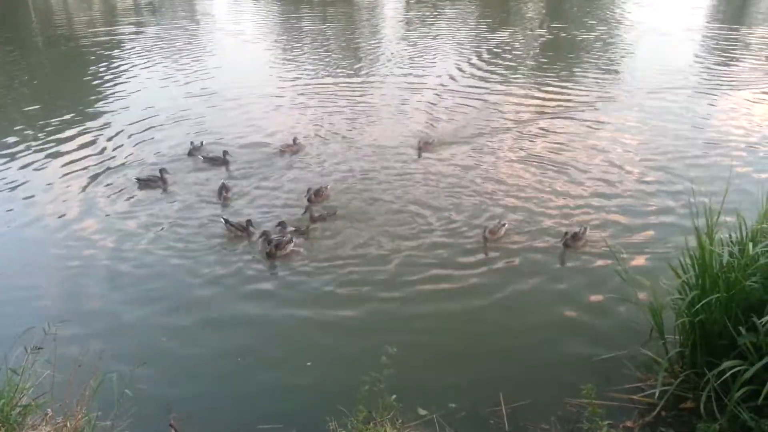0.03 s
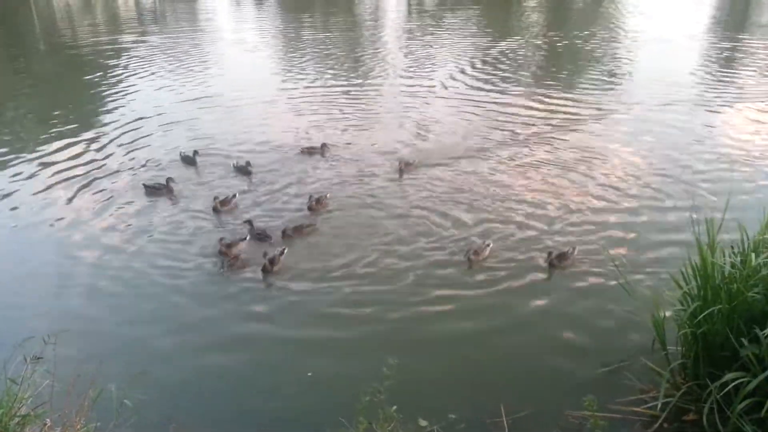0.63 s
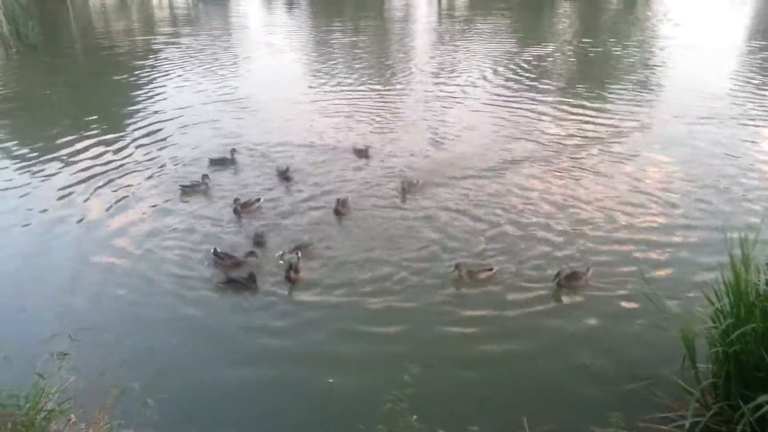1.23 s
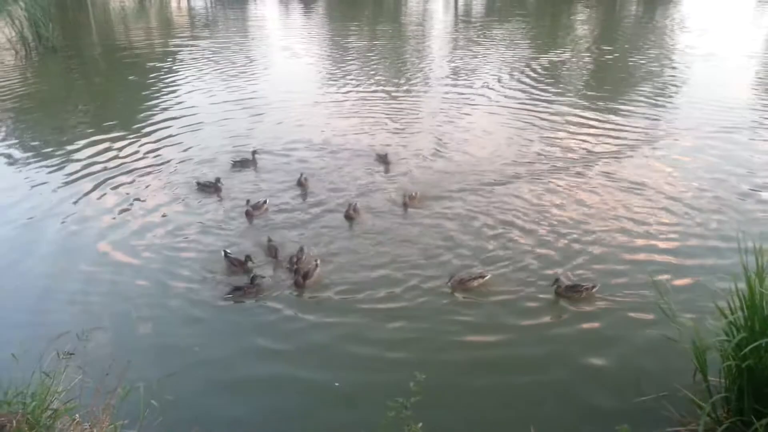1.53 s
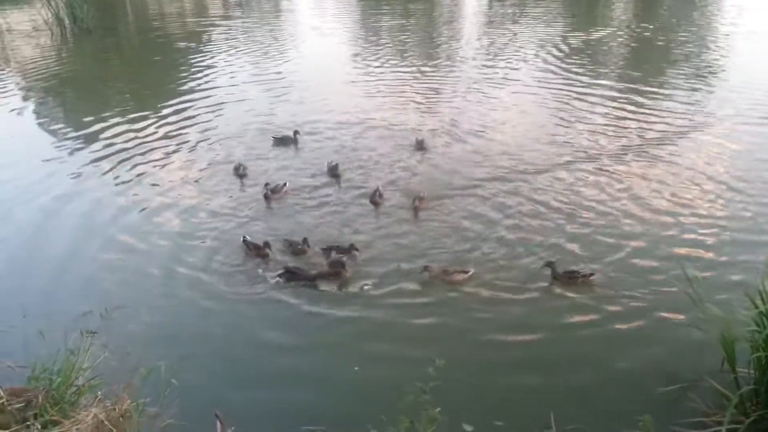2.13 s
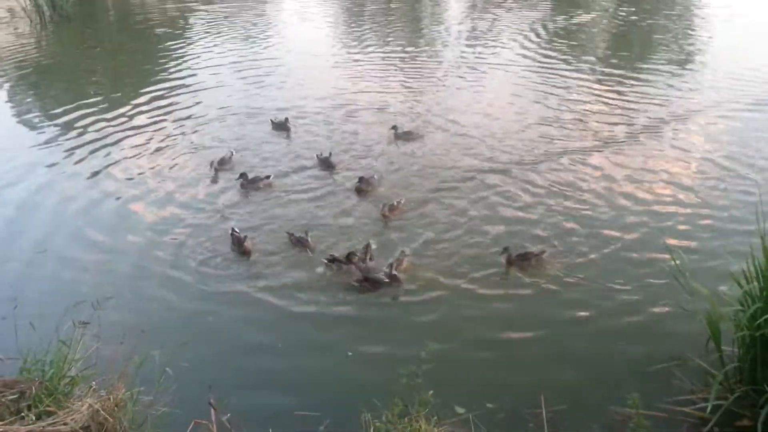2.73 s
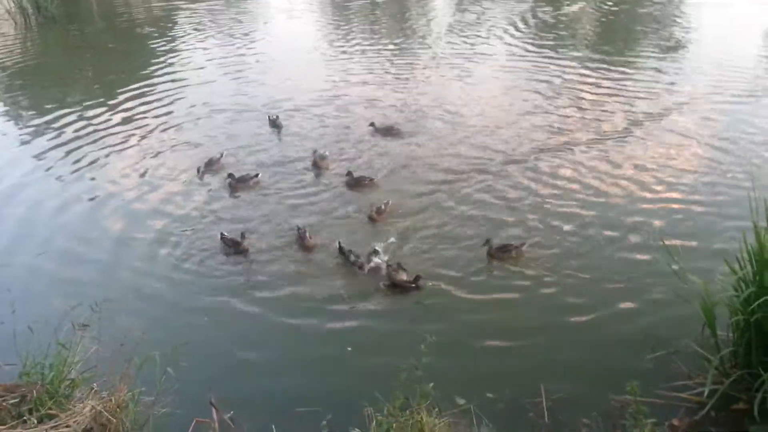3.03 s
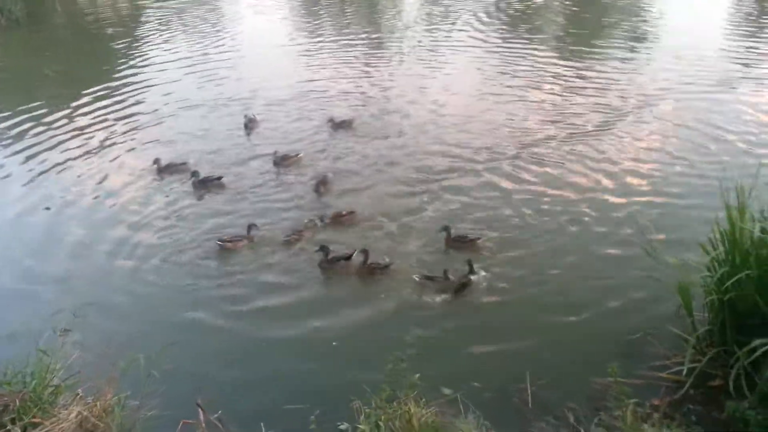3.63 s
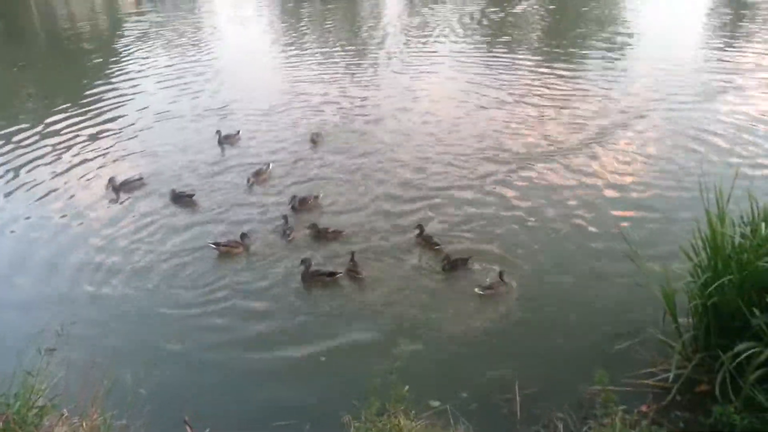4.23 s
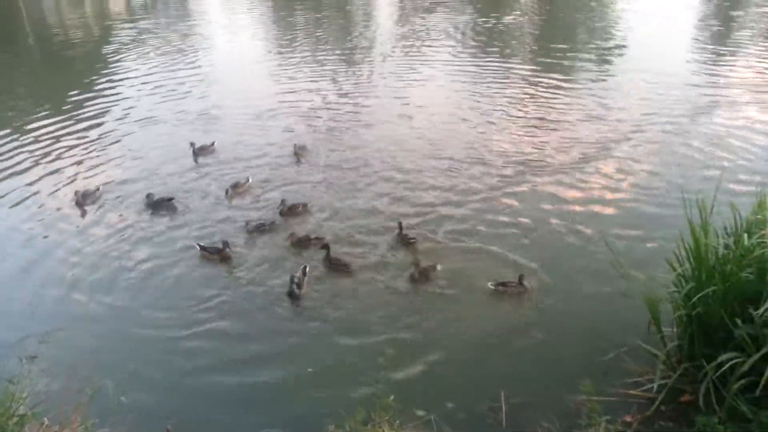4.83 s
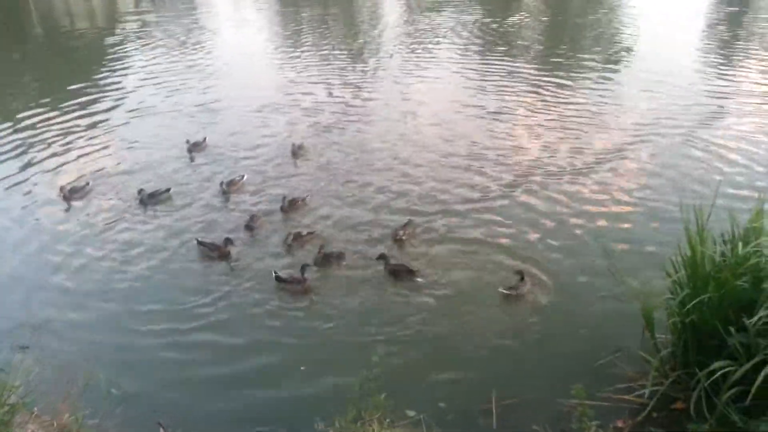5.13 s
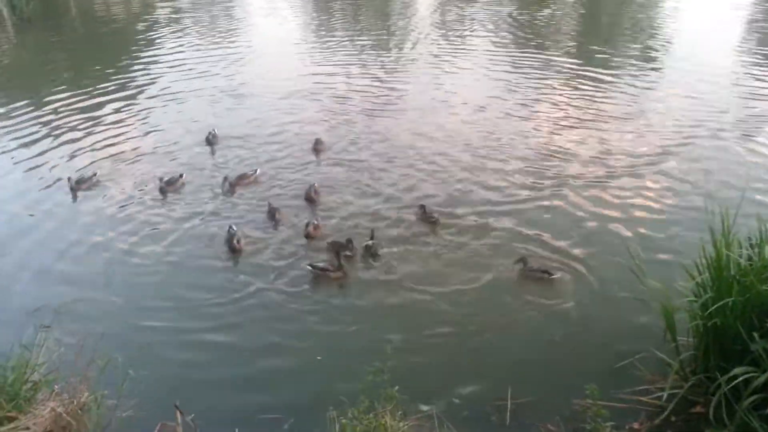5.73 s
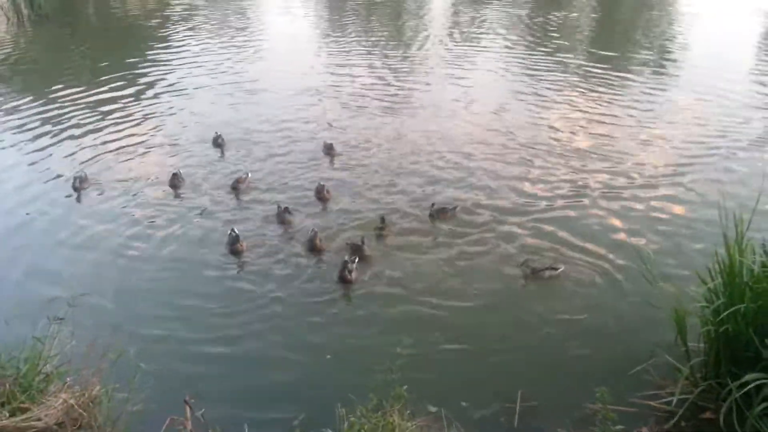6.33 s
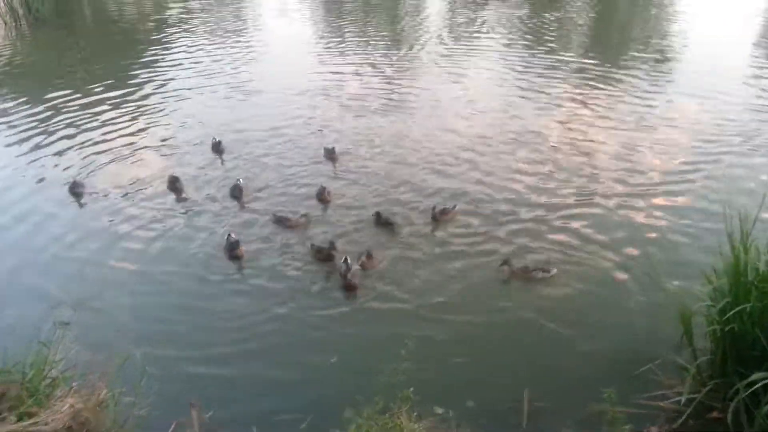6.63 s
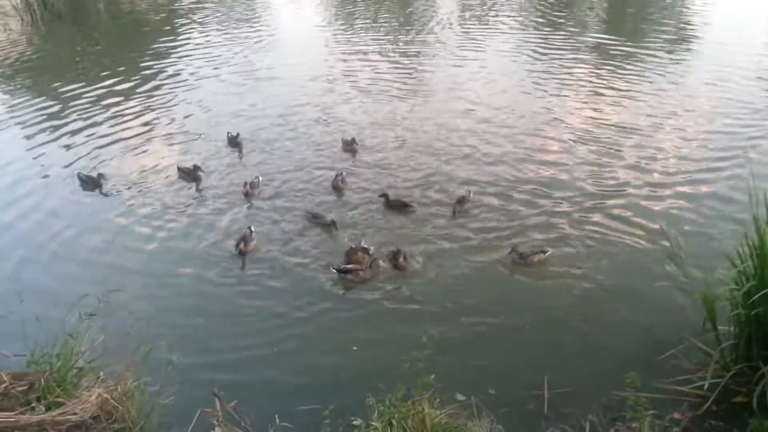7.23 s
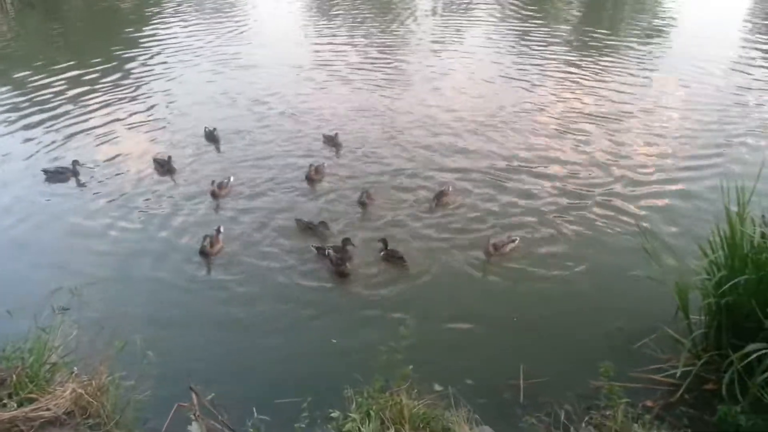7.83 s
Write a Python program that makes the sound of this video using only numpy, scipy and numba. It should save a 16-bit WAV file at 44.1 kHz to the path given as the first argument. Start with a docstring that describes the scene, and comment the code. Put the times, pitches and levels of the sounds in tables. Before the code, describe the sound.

Water plinks and splashes as a flock of ducks paddles, nibbles and quacks briefly, with a faint low outdoor drone behind.

```python
"""On a lake, a few metres out from the bank, a flock of ducks jostles for food.
Their feet stir up spray, drops that plink and bubbles that plop and gurgle; their bills snap and nibble.
They give short, reedy quacks as the voice box claps and makes the throat and bill ring, and thin
whistles when they blow gently. A distant town rumbles behind, and the banks return a faint echo."""
import sys
import numpy as np
from scipy import signal
from scipy.fft import rfft, irfft
from scipy.io import wavfile
from numba import njit

SR = 44100
rng = np.random.default_rng(int(sys.argv[2]) if len(sys.argv) > 2 else 0)


def int16_out(signal):
    """Quantize to a 16-bit WAV file."""
    q = np.round(np.clip(np.atleast_2d(signal).T, -1, 1) * 32767)
    wavfile.write(sys.argv[1], SR, q.astype(np.int16))


N = 352800
TIME = np.arange(N) / SR
FREQUENCIES_HZ = np.arange(N // 2 + 1) * SR / N
SIDES = np.array([[1], [-1]])   # left, right

# the tone of the open air: frequency_hz, relative_db
AIR_TONE = [(15, -58), (25, -37), (103, -6), (158, -2), (224, -9), (293, -9.5), (588, -7), (655, -11),
            (978, -3), (1310, -16), (1630, -11.5), (3730, -26), (6040, -30), (13800, -30), (15000, -42)]
# how alike the background is on the left and right: frequency_hz, likeness (0 to 1)
STEREO_LIKENESS = [(25, .4), (60, 0.95), (150, 0.95), (290, 0.96), (640, 0.47), (1400, 0), (4000, 0),
                   (15000, 0)]
# far engines in the town: pitch_hz, width_hz, level_db
ENGINES = [(78.6, 3.6, -66), (118.5, 13, -65.5), (142.8, 6.5, -53.5), (156, 8.5, -54), (184.1, 7.2, -54.5),
           (283.5, 57, -54.5), (323, 92, -52.5), (960, 450, -55)]
# the slow swell of those engines: time_s, gain_db
ENGINE_SWELL = [(0, 1), (1.6, -0.5), (3.2, 1.6), (4.6, 0.5), (6.7, 3.5), (8, 2.5)]
# how hard the flock paddles: time_s, effort_db
PADDLING_EFFORT = [(0.0, -53), (0.49, -51.5), (0.76, -59), (1.23, -57), (1.98, -60), (2.09, -53),
                   (2.47, -44), (2.76, -44.5), (3.36, -51), (3.83, -46), (4.19, -56), (4.94, -61),
                   (5.86, -51), (6.28, -59), (7.2, -56.5), (7.38, -51), (7.73, -54), (8.0, -52.5)]
USUAL_EFFORT_DB = -54
# the tone of the fine spray: frequency_hz, relative_db
SPRAY_TONE = [(400, -27), (650, -8.5), (950, 0), (1400, -25), (2000, -4.5), (3500, -5.5), (5200, -10),
              (7000, -23), (9500, -17.5), (12500, -21), (15000, -52)]
# large bubbles under feet and breasts: start_s, level_db, pitch_hz
BIG_BUBBLES = [(.063, -39, 770), (.461, -38.5, 930), (1.198, -34.5, 810), (2.252, -33, 995),
               (2.276, -27, 936), (2.367, -30, 1800), (2.413, -27.5, 950), (3.406, -30, 1210),
               (5.73, -40, 885), (5.742, -36.5, 877), (6.350, -38, 1545)]
# air pockets squeezed out of the water: middle_s, half_length_s, level_db, pitch_hz,
# rise_octaves (over each half)
AIR_POCKETS = [(0.111, .015, -38, 880, 0.37), (.486, 0.03, -38.5, 1520, 1), (1.304, 0.013, -39, 1856, .35),
               (1.335, 0.013, -39, 1755, 0.15), (2.347, .022, -33.5, 1354, .7),
               (2.587, .015, -36, 1832, 0.24), (2.724, 0.018, -51, 1320, 0.16),
               (3.994, 0.0099, -30.5, 2010, 0.67), (4.922, 0.013, -51, 2720, 0.48),
               (5.584, 0.024, -42.5, 1920, 0.71), (5.947, 0.0092, -33, 1640, 0.62),
               (7.254, 0.012, -32, 1280, 0.45), (7.773, 0.0072, -31.5, 1740, 0.089)]
# bills snapping shut: start_s, level_db, lowest_pitch_hz
BILL_SNAPS = [(.163, -21.5, 2290), (0.2358, -20.5, 2540), (2.106, -23, 2050), (2.84, -23.5, 2970),
              (2.8434, -18.5, 5550), (3.4374, -23, 2220), (6.354, -30.5, 3430), (7.1368, -39.5, 4230),
              (7.2412, -22.5, 3000), (7.3983, -25, 3730), (7.6176, -25.5, 3080)]
# the tones a bill rings with: multiple_of_lowest_pitch, level_db, ring_s
BILL_TONES = [(1, 0.5, 0.0037), (1.24, 5.5, 0.0034), (1.5, 16.5, 0.00086), (1.9, 7, 0.001),
              (2.3, -7, 0.0024)]
# bills nibbling fast at the surface: start_s, end_s, level_db, swell_db, pitch_hz, unevenness
NIBBLE_RUNS = [(0.254, .33, -33.5, 1, 1860, 0.95), (1.283, 1.384, -33, 0, 1860, 1.02),
               (3.278, 3.329, -27.5, -5, 1870, .6), (3.418, 3.46, -35, 8, 2630, 1.14),
               (5.402, 5.481, -38, -5, 2440, 1.23), (5.609, 5.748, -35, 8, 2400, 0.2),
               (7.249, 7.32, -31, -3, 2370, 1.04), (7.439, 7.604, -32.5, -2, 1960, 0.57)]
# the quacks: loudest_s, rise_s, fall_s, pitch_hz, throat_glide_octaves (per 30 ms), level_db,
# windpipe_hz, windpipe_db, lower_throat_hz, upper_throat_hz, upper_over_lower_db, bill_hz, bill_db,
# reedy_db, reedy_top_hz, rasp (0 to 1), left_delay_us
QUACK_CALLS = [(.402, 0.015, 0.015, 338, 0.086, -36, 880, -7, 1440, 2160, 3, 4100, -2, -5, 8000, 0.5, 54),
               (0.658, 0.018, .014, 357.7, 0.18, -27, 750, -1.5, 1500, 2120, 7, 3200, -6.5, -6, 10000, 0.37, 39),
               (.953, 0.026, 0.011, 287.6, -0.12, -28, 1000, -4, 1600, 1820, 10.5, 3620, -17.5, -9, 11000, 0.38, -3),
               (1.741, 0.018, 0.01, 277.2, 0.037, -31, 900, -3, 1350, 1950, 1, 3520, -14.5, -11, 8000, 0.33, -36),
               (1.938, 0.0098, 0.014, 371, 0.057, -34, 880, -2, 1970, 2800, -23.5, 4070, 5, -14, 7000, 0.66, 35),
               (2.025, 0.021, 0.016, 291.7, -.013, -24.3, 990, -2, 1510, 2000, 5.5, 3700, -15.5, -6.5, 7840, 0.2, -43),
               (2.873, 0.015, 0.02, 291.5, -0.03, -24, 860, -7, 1486, 2130, -2, 5200, -13, -13.5, 10800, 0.4, -37),
               (3.084, 0.011, 0.013, 394, 0.068, -31.5, 900, -4, 1220, 2340, 11, 3150, 0.5, 0.5, 9000, 0.6, 2),
               (3.700, 0.01, 0.0074, 325.6, .034, -25, 1030, -5, 1840, 2320, -0.5, 3930, -6.5, -10, 11000, 0.56, -69),
               (3.950, 0.016, 0.012, 376, 0.25, -18, 1150, -2, 1400, 1900, 11.5, 3980, 2, -0.5, 11700, 0.53, -62),
               (4.877, 0.0076, 0.011, 309, -.15, -26.3, 900, 0.5, 1610, 2220, -0.5, 4480, -12, -15, 7000, 0.64, 36),
               (5.141, 0.011, .015, 330.4, -0.06, -23, 915, -3.5, 1560, 2254, -7.5, 3050, -19.5, -14.5, 10000, 0.31, 51),
               (5.887, 0.015, 0.011, 370.5, .08, -32.5, 785, -2, 1180, 2030, 11, 3860, 4.5, -8, 8000, 0.3, 8),
               (6.656, 0.013, 0.013, 279.8, -0.023, -25.2, 1010, -7, 1650, 2270, 0.5, 3670, -13.5, -6, 5600, 0.44, 33),
               (6.943, 0.013, 0.0073, 280, 0.077, -27, 1100, -6, 1720, 2190, 0, 3320, -10, -9, 5500, 0.22, 25),
               (7.981, 0.013, 0.0082, 299, -0.011, -31, 900, -9, 1360, 2530, -4, 3270, -13.5, -18, 7000, 0.13, 16)]
# the high bands that make every quack reedy: centre_hz, width_hz, level_db
REEDY_BANDS = [(5210, 780, -13), (6600, 1000, -13.5), (8500, 940, -17), (9950, 700, -19.5)]
# thin whistles, around the quacks or alone: middle_s, half_length_s, level_db, pitch_hz,
# glide_octaves (over each half), arch_octaves
WHISTLE_CALLS = [(0.623, 0.039, -40, 896, -0.031, -0.12), (0.694, 0.023, -46, 1037, -0.43, -0.031),
                 (0.915, 0.02, -37, 1092, -.35, 0), (0.982, 0.023, -34.5, 1286, -0.38, 0.028),
                 (1.766, 0.033, -38, 1287, -0.16, 0.099), (1.997, 0.015, -31, 1387, -.4, 0.048),
                 (2.061, 0.037, -36.5, 1230, -0.44, 0.17), (2.917, 0.023, -38, 1370, -.25, 0.045),
                 (3.069, 0.014, -30.5, 1160, -.45, 0.03), (3.125, 0.047, -35, 883, -0.033, -0.038),
                 (3.425, .025, -31, 1048, 0, -.15), (3.674, 0.04, -31, 1058, 0, 0.031),
                 (3.928, 0.01, -27.5, 1090, -0.23, -0.041), (3.977, 0.013, -36.5, 946, -0.17, 0.087),
                 (4.856, 0.013, -32.5, 2130, -0.13, 0.016), (4.924, 0.03, -36.5, 1580, 0.0037, 0.079),
                 (5.114, 0.013, -35.5, 1480, -0.077, 0.122), (5.131, 0.01, -34, 2240, -0.33, -0.0082),
                 (5.421, .025, -39.5, 1084, -.5, -0.14), (5.872, 0.019, -38, 1087, -0.41, 0),
                 (6.623, 0.02, -39.5, 2200, 0.36, -0.065), (6.634, 0.015, -41, 1002, -0.033, 0.021),
                 (6.694, 0.027, -39, 2480, -.05, 0.19), (6.897, 0.033, -40.5, 2380, -0.34, 0.094),
                 (6.959, 0.024, -34, 1490, -0.25, 0.1), (6.972, 0.013, -36.5, 2430, -0.22, -0.066),
                 (7.946, 0.022, -37, 953, -.25, 0)]
USUAL_CALL_HZ, USUAL_CALL_DB = 320, -28   # an ordinary quack
# the largest drops landing on the water: start_s, level_db, pitch_hz
BIG_DROPS = [(1.198, -27, 2200), (1.348, -31, 2400), (1.404, -26, 1750), (1.4051, -23, 2980),
             (1.471, -35, 4560), (1.514, -29.5, 3850), (2.252, -24.5, 2900), (2.2863, -20, 3200),
             (2.304, -19.5, 2460), (2.582, -22.5, 1800), (2.664, -26.5, 5100), (2.413, -22, 2000),
             (2.9723, -20, 4500), (3.1894, -25, 2920), (3.605, -18.5, 2250), (3.38, -24.5, 3380),
             (3.453, -25, 3270), (4.211, -24, 2770), (5.251, -31.5, 4180), (5.364, -30.5, 2850),
             (5.449, -28.5, 3250), (5.964, -21.5, 2260), (6.141, -31.5, 4300), (6.231, -26, 2824),
             (7.441, -27, 1900), (7.481, -27, 3220), (7.646, -27.5, 4270), (7.757, -22.5, 1850)]
# handfuls of water flicked up by feet and wings: start_s, length_s, level_db, pitch_hz
WATER_FLICKS = [(2.36, 0.017, -32, 5560), (2.41, 0.02, -31, 4020), (2.542, 0.0052, -35.5, 8500),
                (2.659, .006, -33, 10100), (2.736, 0.021, -44, 5500), (2.988, 0.0077, -30, 5540),
                (3.026, .006, -36, 6900), (3.295, 0.019, -33, 5960), (3.419, 0.0068, -34, 10000),
                (3.434, 0.0073, -30.5, 8100), (3.619, 0.05, -36, 8000), (3.81, 0.046, -42, 9500),
                (5.734, 0.041, -33.5, 2890), (5.997, 0.045, -39, 3050), (6.09, 0.021, -41, 3480),
                (6.275, 0.018, -37, 2780), (6.854, .002, -35, 10500), (7.257, .04, -31.5, 3030),
                (7.348, .025, -33.5, 3000)]
# how the flock reaches the two microphones: frequency_hz, left_lag_radians, left_over_right_db
MICROPHONE_SHADING = [(100, -.05, 0), (330, -.1, 0), (1000, -.42, 1.5), (1150, -.4, 5), (1400, -.2, 7.2),
                      (2000, -.05, 7.2), (4000, .6, 6.8), (12000, .9, 7)]


def from_db(db):
    """Turn decibels into a number to multiply by."""
    return 10 ** (np.asarray(db) / 20)


def rms_one(x):
    """Scale a sound to an average strength (rms) of 1."""
    return x / np.sqrt(np.mean(x ** 2) + 1e-20)


def in_time(rows):
    """Join (time_s, value) points into a curve over the whole scene."""
    return np.interp(TIME, *np.transpose(rows))


def in_frequency(rows):
    """Join (frequency_hz, value) points into a curve, giving every octave equal room."""
    hz, value = np.transpose(rows)
    return np.interp(np.log(FREQUENCIES_HZ + 1), np.log(hz), value)


def add(track, start_s, sound):
    """Mix a sound into a track."""
    i = int(np.clip(start_s * SR, 0, N - 1))
    track[..., i:i + sound.shape[-1]] += sound[..., :N - i]


def variations(shape):
    """Bell-curve random numbers, kept between -2 and 2."""
    return np.clip(rng.standard_normal(shape), -2, 2)


def random_events(per_s, traits):
    """Pick random start samples, each with a few random numbers to make it different."""
    starts = np.flatnonzero(rng.random(N) < per_s / SR)
    return zip(starts, variations((len(starts), traits)))


def keep_band(x, hz, kind, order=2):
    """Keep the "low" or the "high" side of a frequency."""
    sections = signal.butter(order, min(hz, .45 * SR), kind, fs=SR, output="sos")
    return signal.sosfilt(sections, x + 1e-18)


def hollow(x, hz, width_hz):
    """Ring like a hollow space: two wider resonances in a row narrow to about width_hz."""
    r = np.exp(-np.pi * 1.5 * width_hz / SR)
    forward = np.array([1, 0, -1]) * (1 - r * r) / 2
    feedback = [1, -2 * r * np.cos(2 * np.pi * hz / SR), r * r]
    return signal.lfilter(forward, feedback, signal.lfilter(forward, feedback, x))


@njit
def moving_hollow(x, hz, width_hz):
    """Ring like a hollow space that changes shape; hz has one value for each sample."""
    r = np.exp(-np.pi * width_hz / SR)
    out, state = np.zeros(len(x)), 0j
    for i in range(len(x)):
        state = state * r * np.exp(2j * np.pi * hz[i] / SR) + x[i]
        out[i] = 2 * (1 - r) * state.real
    return out


def place(x, pan_db):
    """Make the left side louder than the right by pan_db."""
    gains = from_db(SIDES * pan_db / 2)
    return x * gains / gains.mean()


def from_side(x, delay_us):
    """Let a short sound reach the left microphone delay_us later than the right."""
    turn = np.pi * delay_us / 1e6 * np.arange(len(x) // 2 + 1) * SR / len(x)
    return irfft(rfft(x) * np.exp(-1j * turn * SIDES), len(x))


def surrounding_noise(tone_db=0):
    """Noise from all around: alike on both sides in the bass, unrelated in the treble."""
    middle, side = rfft(rng.standard_normal((2, N)))
    alike = np.clip(in_frequency(STEREO_LIKENESS), 0, .995)
    pair = np.sqrt(1 + alike) * middle + np.sqrt(1 - alike) * side * SIDES
    return rms_one(irfft(pair * from_db(tone_db), N))


def town_and_air(air_db=-44.5, surge_at_s=4.03, surge_width_s=.08, surge_db=7):
    """Far engines drone in narrow bands, with one brief surge, over the hush of open air."""
    noise = surrounding_noise()
    drone = sum(from_db(db) * rms_one(hollow(noise, hz, width_hz)) for hz, width_hz, db in ENGINES)
    surge = surge_db * np.exp(-((TIME - surge_at_s) / surge_width_s) ** 2)
    swell = from_db(in_time(ENGINE_SWELL) + surge)
    air = from_db(air_db) * surrounding_noise(in_frequency(AIR_TONE))
    return place(drone * swell + air, pan_db=1.0)


def paddling_effort():
    """How hard the flock paddles at each moment; 1 is usual."""
    return from_db(in_time(PADDLING_EFFORT) - USUAL_EFFORT_DB)


def ring(hz, ring_s, glide, onset_s):
    """A tone that fades by 60 dB in ring_s; a bubble's pitch glides as it nears the surface."""
    t = np.arange(int(ring_s * SR) + 8) / SR
    tone = np.sin(2 * np.pi * hz * t * (1 + glide * t / ring_s / 2))
    return tone * from_db(-60 * t / ring_s) * (1 - np.exp(-t / onset_s))


def drop(hz, ring_s, slap_gain=.52, slap_s=.0035):
    """A drop slaps the surface and traps a small bubble, which rings."""
    bubble = ring(hz, ring_s, glide=rng.uniform(-.05, .2), onset_s=.00015)
    t = np.arange(len(bubble)) / SR
    slap = rng.standard_normal(len(t)) * np.exp(-t / slap_s)
    return 1.05 * bubble + slap_gain * hollow(slap, min(.59 * hz, SR / 4), .71 * hz)


def spray(per_s=4000, scatter_db=-7):
    """Countless tiny bursts, a few of them large, crackle from all over the flock."""
    sizes = from_db(2.5 * np.minimum(rng.exponential(1, N), 3)) * rng.choice([-1, 1], N)
    clicks = sizes * (rng.random(N) < per_s / SR)
    pair = clicks * from_db(scatter_db * rng.standard_normal((2, N)))
    return rms_one(irfft(rfft(pair) * from_db(in_frequency(SPRAY_TONE)), N))


def paddling(usual_per_s=220, centre_hz=2800, spread=.61, cycles=30, level_db=-51, slosh_db=4):
    """Feet stir the water: more effort throws more and louder droplets over a sloshing spray."""
    droplets, effort = np.zeros((2, N)), paddling_effort()
    for i, (pitch, size, side, linger) in random_events(usual_per_s * np.clip(effort, .2, 6), 4):
        hz = min(centre_hz * np.exp(spread * pitch), SR / 4)
        gain = from_db(3 * size - 3 * max(pitch, 0)) * effort[i]   # small, high drops are the weakest
        droplet = drop(hz, cycles / hz * np.exp(.3 * linger))
        add(droplets, i / SR, place(gain * droplet, pan_db=2 * side))
    droplets = rms_one(droplets) * np.sqrt(np.mean(effort ** 2))
    slosh = from_db(slosh_db * rms_one(keep_band(rng.standard_normal(N), 20.6, "low")))
    return from_db(level_db) * (droplets + .55 * spray() * effort * slosh)


def drips(usual_per_s=14, level_db=-46, centre_hz=3310, spread_octaves=.56, cycles=40):
    """Water runs off bills and feathers in plinks, more and louder as the flock gets busy."""
    out, busy = np.zeros((2, N)), np.sqrt(paddling_effort())
    for i, (pitch, size, side, glide) in random_events(usual_per_s * busy, 4):
        hz = centre_hz * 2 ** (spread_octaves * pitch)
        plink = ring(hz, cycles / hz, glide=.1 * (1 + glide), onset_s=.0002)
        add(out, i / SR, place(busy[i] * from_db(level_db + .5 * size) * plink, pan_db=2 * side))
    return out


def finest_droplets(usual_per_s=45, level_db=-50, centre_hz=8200, spread_octaves=.456, cycles=45):
    """The finest droplets tick high and clear, mostly while the flock thrashes."""
    out, effort = np.zeros((2, N)), paddling_effort()
    for i, (pitch, size, side) in random_events(usual_per_s * effort, 3):
        hz = min(centre_hz * 2 ** (spread_octaves * pitch), SR / 3)
        tick = ring(hz, cycles / hz, glide=.1, onset_s=.0001)
        add(out, i / SR, place(effort[i] * from_db(level_db + .5 * size) * tick, pan_db=2 * side))
    return out


def plop(hz):
    """A large bubble rings, usually rising in pitch."""
    return ring(hz, ring_s=.059, glide=rng.uniform(-.17, .74), onset_s=.00014)


def plops(boost_db=3.5, gulps_per_s=8.2, gulp_db=-39, gulp_hz=972, spread_octaves=.318):
    """Feet and breasts trap large bubbles: some stand out, softer gulps come with the paddling."""
    out, busy = np.zeros(N), np.sqrt(paddling_effort())
    for start_s, db, hz in BIG_BUBBLES:
        add(out, start_s, from_db(db + boost_db) * plop(hz))
    for i, (pitch, softness) in random_events(gulps_per_s * busy, 2):
        gulp = plop(gulp_hz * 2 ** (spread_octaves * pitch))
        add(out, i / SR, busy[i] * from_db(gulp_db - 2 * softness) * gulp)
    return out


def air_pocket(half_s, hz, rise_octaves, quiver=.039, flutter=.35):
    """A shrinking, wobbling pocket of air sings upward, loudest in the middle."""
    position = np.arange(-half_s, half_s, 1 / SR) / half_s   # -1 to 1
    shakes = rms_one(keep_band(rng.standard_normal((2, len(position) + SR // 50)), 200, "low"))
    pitch_shake, level_shake = shakes[:, -len(position):]
    pitch_hz = hz * 2 ** (rise_octaves * position) * (1 + quiver * pitch_shake)
    swell = np.cos(np.pi * position / 2) ** 2 * (1 + flutter * level_shake)
    return np.sin(2 * np.pi * np.cumsum(pitch_hz) / SR) * swell


def gurgles(burbles_per_s=6.5, burble_db=-45, burble_hz=2001, burble_half_s=.0074, spread_octaves=.68):
    """Air is squeezed out of the water: clear gurgles, and small burbles that come with the paddling."""
    out, effort = np.zeros(N), paddling_effort()
    for middle_s, half_s, db, hz, rise_octaves in AIR_POCKETS:
        add(out, middle_s - half_s, from_db(db) * air_pocket(half_s, hz, rise_octaves))
    for i, (pitch, size, rise) in random_events(burbles_per_s * effort, 3):
        ratio = 2 ** (spread_octaves * pitch)   # small pockets are high and brief
        burble = air_pocket(burble_half_s / np.sqrt(ratio), burble_hz * ratio, .21 * (1 + .5 * rise))
        add(out, i / SR, effort[i] * from_db(burble_db + 2.5 * size) * burble)
    return out


def snaps(boost_db=3.5, top_hz=11500):
    """The two halves of a bill meet, and it rings for a few thousandths of a second."""
    out = np.zeros(N)
    for start_s, db, hz in BILL_SNAPS:
        snap = np.zeros(SR // 20)
        for k, (multiple, tone_db, ring_s) in enumerate(BILL_TONES):
            tone = ring(hz * multiple * rng.normal(1, .0088), ring_s, glide=0, onset_s=.0001)
            snap[:len(tone)] += (-1) ** k * from_db(tone_db + rng.normal(0, 1)) * tone
        add(out, start_s, from_db(db + boost_db) * keep_band(snap, top_hz, "low"))
    return out


def bite(hz, uneven, squirt_db=-12.5, squirt_s=.0043):
    """A closing bill squeezes out a chirp of air; a sloppy bite rises less and squirts more water."""
    t = TIME[:SR // 20]
    squirt = rms_one(hollow(rng.standard_normal(len(t)), min(1.25 * hz, SR / 4), width_hz=hz))
    swell = t / squirt_s * np.exp(1 - t / squirt_s)
    out = from_db(squirt_db) * (1 + uneven) / 2 * squirt * swell
    add(out, 0, air_pocket(half_s=.004, hz=hz, rise_octaves=.5 * (1 - uneven / 2)))
    return out


def nibbles(bites_per_s=74.8, trim_db=-5, spread=.196, jitter_s=.003, lead_s=.004):
    """Bills rattle at the surface in quick, uneven runs of small bites."""
    out = np.zeros(N)
    for start_s, end_s, db, swell_db, hz, uneven in NIBBLE_RUNS:
        times = np.arange(start_s, end_s, 1 / bites_per_s)
        for time_s, progress in zip(times, np.linspace(-.5, .5, len(times))):
            pitch, late, size = uneven * variations(3)
            gain = from_db(db + trim_db + swell_db * progress + 2 * size)
            add(out, time_s + jitter_s * late - lead_s, gain * bite(hz * np.exp(spread * pitch), uneven))
    return out


def voice_box(t, pitch_hz, swell, rasp, jitter=.018, sag=.05, uneven_db=12):
    """A duck's voice box claps once a cycle and lets out a puff of air; rasp favours the puffs."""
    wobble_times = np.arange(-.08, .09, .004)
    wobble, force = [np.interp(t, wobble_times, row)
                     for row in rng.standard_normal((2, len(wobble_times)))]
    drift = 1 + jitter * np.sqrt(rasp) * wobble - sag * (1 - swell)   # pitch sags with the pressure
    cycles = np.cumsum(pitch_hz * drift) / SR
    cycles -= cycles[len(t) // 2]
    claps = np.diff(np.floor(cycles), prepend=np.floor(cycles[0])) * from_db(uneven_db * rasp * force)
    puffs = keep_band(rng.standard_normal(len(t)), 4700, "low", order=1) * np.exp(-3 * (cycles % 1))
    return swell * np.sqrt(1 - rasp) * rms_one(claps), swell * np.sqrt(rasp) * rms_one(puffs)


def quack(rise_s, fall_s, pitch_hz, glide, windpipe_hz, windpipe_db, lower_hz, upper_hz, upper_db,
          bill_hz, bill_db, reedy_db, reedy_top_hz, rasp, chest_db):
    """The voice box makes the moving throat, the chest and the bill ring; loudest in the middle."""
    t = np.arange(-.08, .08, 1 / SR)
    from_peak = np.abs(t) / np.where(t < 0, rise_s, fall_s)
    steepness = np.where(t < 0, 3.5, 1.84)
    swell = .9 * np.exp(-.5 * from_peak ** steepness) + .1 * np.exp(-(from_peak / 2.2) ** 2)
    bend = 2 ** (glide * np.clip(t / .03, -1, 1))
    gentle_bend = bend ** .37   # the pitch and the upper throat follow only part of the way
    claps, puffs = voice_box(t, pitch_hz * gentle_bend, swell, rasp)
    into_throat, into_bill = claps + .65 * puffs, claps + puffs

    lower = moving_hollow(into_throat, lower_hz * bend, width_hz=170)
    upper = moving_hollow(into_throat, upper_hz * gentle_bend, width_hz=170)
    tilt = from_db(upper_db / 2)
    throat = keep_band(lower / tilt - upper * tilt, 1.28 * upper_hz, "low", order=6)
    throat = keep_band(throat, 700, "high")
    chest = from_db(chest_db - 2.7) * hollow(into_throat, hz=300, width_hz=137)
    windpipe = from_db(chest_db + windpipe_db) * hollow(into_throat, windpipe_hz, width_hz=340)

    narrow = from_db(bill_db - 8.5) * hollow(into_bill, bill_hz, width_hz=360)
    broad = from_db(bill_db - 6.5) * hollow(into_bill, hz=3100, width_hz=1670)
    bill = keep_band(narrow + broad, 1.41 * bill_hz, "low", order=6)
    reedy = sum((-1) ** k * from_db(db + reedy_db) * hollow(into_bill, hz, width_hz)
                for k, (hz, width_hz, db) in enumerate(REEDY_BANDS))
    reedy = keep_band(reedy, reedy_top_hz, "low", order=8)
    return rms_one(throat + chest + windpipe + bill + reedy) * np.sqrt(np.mean(swell ** 2))


def quacks():
    """Ducks quack here and there in the flock; higher and softer quacks carry more chest."""
    out = np.zeros((2, N))
    for loudest_s, rise_s, fall_s, pitch_hz, glide, db, *voice, delay_us in QUACK_CALLS:
        chest_db = -.5 + .1 * (pitch_hz - USUAL_CALL_HZ) - .5 * (db - USUAL_CALL_DB)
        call = quack(rise_s, fall_s, pitch_hz, glide, *voice, chest_db)
        add(out, loudest_s - len(call) / SR / 2, from_db(db) * from_side(call, delay_us))
    return out


def whistle(half_s, hz, glide, arch, overtone_db, top_hz=4760, quiver=.03, flutter=.25):
    """At low pressure the voice box whistles a quivering, arching tone."""
    position = np.arange(-half_s, half_s, 1 / SR) / half_s   # -1 to 1
    pitch_shake, level_shake = rms_one(keep_band(rng.standard_normal((2, len(position))), 330, "low"))
    octaves = glide * position - arch * (2 * position) ** 2
    phase = 2 * np.pi * np.cumsum(hz * 2 ** octaves * (1 + quiver * pitch_shake)) / SR
    swell = np.cos(np.pi * position / 2) ** 2 * (1 + flutter * level_shake)
    overtones = sum(np.sin(k * phase) for k in range(2, int(top_hz / hz) + 1))
    return (np.sin(phase) + from_db(overtone_db) * overtones) * swell


def whistles():
    """Each whistle comes from the duck that quacks nearest in time; louder ones are brighter."""
    out = np.zeros((2, N))
    for middle_s, half_s, db, *tune in WHISTLE_CALLS:
        *_, delay_us = min(QUACK_CALLS, key=lambda row: abs(row[0] - middle_s))
        overtone_db = min(-3.5 + 3 * (db - USUAL_CALL_DB), 0)
        call = whistle(half_s, *tune, overtone_db)
        add(out, middle_s - half_s, from_db(db) * from_side(call, delay_us))
    return out


def big_drops(cycles=20):
    """The largest drops land one by one, each with a short plink."""
    out = np.zeros(N)
    for start_s, db, hz in BIG_DROPS:
        add(out, start_s, from_db(db) * drop(hz, cycles / hz))
    return out


def spatters(droplets_per_s=700, spread_octaves=.444, cycles=32, fade_db=20.5):
    """A flick of a foot or wing throws a handful of tiny droplets; the largest land first."""
    out = np.zeros(N)
    for start_s, length_s, db, centre_hz in WATER_FLICKS:
        count = 2 + int(droplets_per_s * length_s)
        for k, (pitch, softness, late) in enumerate(variations((count, 3))):
            progress = (k + .4 * late * (k > 0)) / count
            hz = min(centre_hz * 2 ** (spread_octaves * pitch), SR / 3)
            gain = from_db(db - 1.5 * softness - fade_db * progress)
            add(out, start_s + length_s * progress, gain * drop(hz, cycles / hz))
    return out


def bank_echo(x, near_db=-15, near_s=.04, far_db=-18, far_s=.14):
    """Ripples and reeds scatter the sound at once; trees along the shore add a dull, faint tail."""
    t = TIME[:SR]
    near, far = rng.standard_normal((2, 2, SR))
    near = keep_band(near, 9000, "low") * from_db(-60 * t / near_s)
    far = keep_band(far, 3500, "low") * from_db(-60 * t / far_s) * (1 - np.exp(-t / .0076))
    echo = (from_db(near_db) * rms_one(near) + from_db(far_db) * rms_one(far)) / np.sqrt(SR)
    return signal.fftconvolve(x.mean(axis=0)[None], echo, axes=1)[:, :N]


def microphone_shading(x):
    """The case around two microphones shifts their timing and shades the right one from the treble."""
    table = np.array(MICROPHONE_SHADING)
    lag_radians, pan_db = in_frequency(table[:, [0, 1]]), in_frequency(table[:, [0, 2]])
    gains = from_db(SIDES * pan_db / 2)
    return irfft(rfft(x) * gains / gains.mean(axis=0) * np.exp(-.5j * lag_radians * SIDES), N)


def scene():
    """The flock to the left of centre, its echo, and the town behind."""
    flock = quacks() + whistles() + snaps() + nibbles()
    flock += big_drops() + plops() + gurgles() + paddling() + drips() + spatters() + finest_droplets()
    return microphone_shading(flock) + bank_echo(flock) + town_and_air()


def record(dry):
    """The microphone thins the deepest bass, below 55 Hz; the treble is cut above 14800 Hz."""
    treble_cut = signal.ellip(10, .1, 80, 14800, fs=SR, output="sos")
    return signal.sosfilt(treble_cut, keep_band(dry, 55, "high"))


dry = scene()
out = record(dry)
int16_out(out)
```